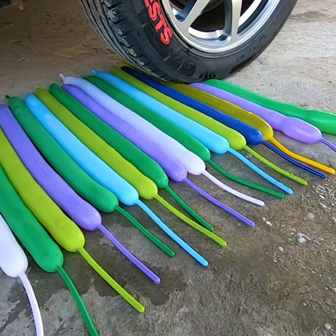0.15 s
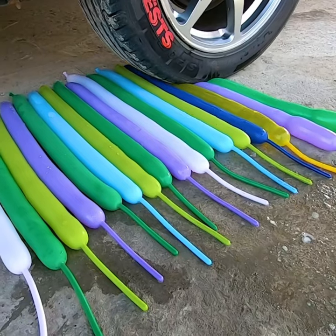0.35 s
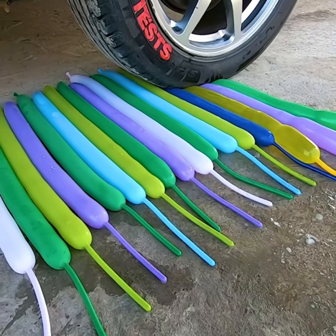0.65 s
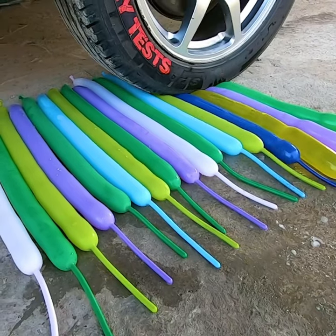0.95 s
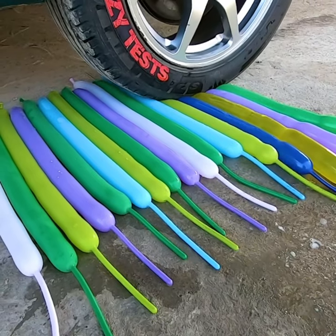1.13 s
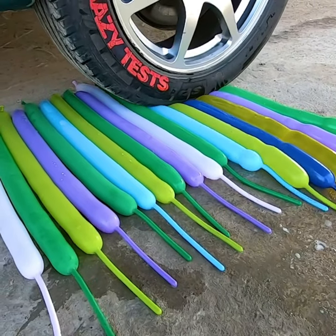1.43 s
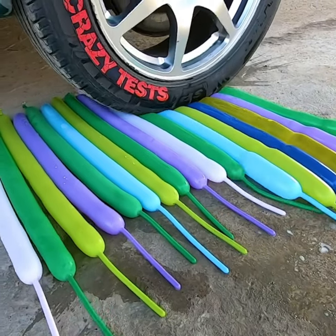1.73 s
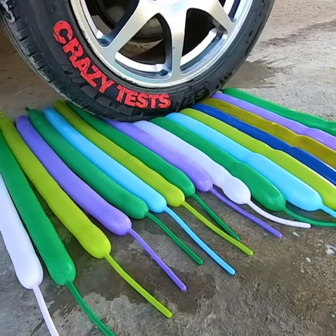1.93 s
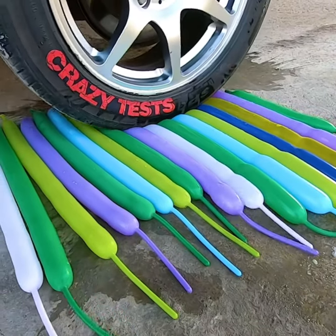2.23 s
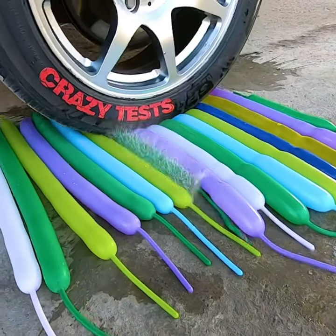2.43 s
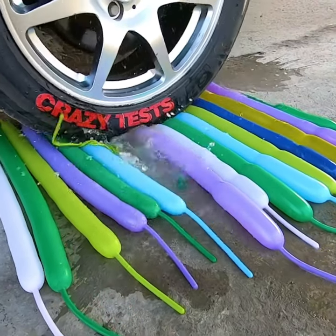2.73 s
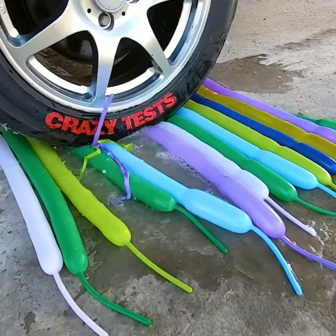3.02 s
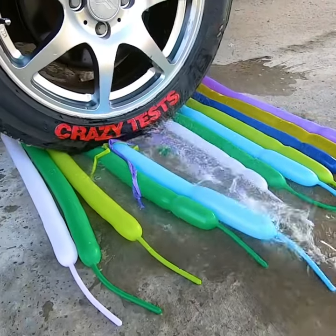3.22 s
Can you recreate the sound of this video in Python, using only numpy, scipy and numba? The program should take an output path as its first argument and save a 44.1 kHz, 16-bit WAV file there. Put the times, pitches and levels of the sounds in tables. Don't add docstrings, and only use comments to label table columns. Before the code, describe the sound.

Balloons full of water crack and splash under a tyre in separate bursts, after a quieter stretch of deep idling engine, airy yard noise and a leaking squirt; close, dry outdoor pickup with little echo.

```python
import sys
import numpy as np
from scipy import signal
from scipy.fft import rfft, irfft, next_fast_len
from scipy.io import wavfile
from scipy.ndimage import uniform_filter1d
from numba import njit

SR = 44100
rng = np.random.default_rng(int(sys.argv[2]) if len(sys.argv) > 2 else 0)


def invert_db(level):
    return 10 ** (np.asarray(level, dtype=float) / 20)


def transcribe(signal):
    frames = np.atleast_2d(signal).T
    limited = np.clip(frames, -1, 1)
    pcm = np.round(limited * 32767).astype(np.int16)
    wavfile.write(sys.argv[1], SR, pcm)


N = 148617
T = np.arange(N) / SR


def unit(x):
    return x / np.sqrt(np.mean(x ** 2) + 1e-30)


def curve(table, axis):
    return np.interp(T, np.array(table)[:, 0], np.array(table)[:, axis])


def colour(x, points):
    n, p = next_fast_len(len(x)), np.array(points)
    hz = np.maximum(np.arange(n // 2 + 1) * SR / n, 1)
    gain_db = np.interp(np.log(hz), np.log(p[:, 0]), p[:, 1])
    return irfft(rfft(x, n) * invert_db(gain_db), n)[:len(x)]


def band(x, hz, width):
    return signal.lfilter(*signal.iirpeak(min(hz, .45 * SR), hz / min(width, .3 * SR), SR), x)


def steep(x, hz, width):
    return unit(band(band(x, hz, width), hz, width))


def noise(n=N):
    return rng.standard_normal(n)


def walk(rate):
    k = int(SR / rate)
    steps = np.repeat(noise(N // k + 1), k)
    return uniform_filter1d(uniform_filter1d(steps, k), k)[:N]


def shape(t, rise, hold, t60):
    return np.clip(t / rise, 0, 1) * invert_db(-60 * np.clip(t - rise - hold, 0, None) / max(t60, .002))


def add(out, s, x):
    i = int(s * SR)
    out[i:i + len(x)] += x[:N - i]


@njit
def drops(at, hz, cycles, size, glide, n, sr):
    out = np.zeros(n)
    for j in range(len(at)):
        long, phase = cycles[j] * sr / hz[j], 0.
        for i in range(min(int(2 * long), n - at[j])):
            phase += 2 * np.pi * hz[j] / sr * (1 + glide * i / long)
            out[at[j] + i] += size[j] * np.sin(phase) * np.exp(-3 * i / long)
    return out


def patter(n, octaves, hz, cycles, scatter_db, count):
    u, g = rng.random((count, 3)).T, noise(count)
    at = (u[0] * n).astype(np.int64)
    pitch = np.clip(hz[at] * 2 ** (octaves * g), 300, 15000)
    size = invert_db(-scatter_db * np.log(u[1] + 0.0014))
    ring_cycles = cycles * (.5 + 2 * u[2] ** 2)
    return unit(drops(at, pitch, ring_cycles, size, 0.16, n, 1. * SR))


def yard():
    # frequency in Hz, level in dB per Hz.
    tone = [(45, -6), (150, 1), (380, -11.5), (640, -7.5), (1400, -16), (2800, -26.5), (5000, -31),
            (12000, -45.5)]
    # frequency in Hz, gain in dB.
    top = [(13000, 0), (14500, -25)]
    base, swell, out = colour(noise(), tone), walk(0.77), 0
    for hz in 50 * 2 ** np.arange(0, 8.3, .5):
        flicker_db = swell + 1.6 * walk(14)
        out = out + invert_db(flicker_db) * band(base, hz, hz / 2.5)
    return invert_db(-51.5) * unit(colour(out, top))


def buffet():
    gust_s, gust_long_s = 2.927, 0.16
    gust_db = 18.5 * np.exp(-((T - gust_s) / gust_long_s) ** 2)
    return invert_db(-39 + gust_db) * steep(noise(), 11, 4.1)


def hiss():
    t60_s = 1.74
    return invert_db(-68 - 60 * T / t60_s) * unit(band(noise(), 10000, 8100))


def chirps():
    # start in seconds, level in dB, first pitch in Hz, last pitch in Hz, length in seconds.
    notes_sung = [
        (.35, -72, 5900, 5700, .025),
        (0.711, -69, 3800, 4100, 0.037),
        (0.739, -68.5, 3500, 3120, .035),
        (1.038, -72, 4600, 4950, .06),
        (1.085, -69, 4700, 4280, 0.026),
        (1.117, -71, 3700, 4050, 0.049),
        (1.15, -71, 4350, 4370, 0.022),
        (1.409, -70, 3300, 3500, 0.037),
        (1.445, -70, 3900, 3950, .025),
        (1.463, -68, 3700, 3620, .04),
    ]
    fade_db, flutter_db, whine_hz = -5, 6, 5200
    out = invert_db(-85) * unit(band(noise(), whine_hz, whine_hz / 60))
    for s, db, hz, last_hz, long in notes_sung:
        u = np.arange(int(long * SR)) / (long * SR)
        level = invert_db(db + fade_db + flutter_db * walk(150)[:len(u)])
        phase = 2 * np.pi * np.cumsum(hz + (last_hz - hz) * u) / SR
        add(out, s, level * 2 * np.sin(np.pi * u) * np.sin(phase))
    return out


def fan():
    return np.sqrt(2) * invert_db(-55.5 + 2 * walk(0.91)) * np.sin(2 * np.pi * 68 * T)


def belt():
    return invert_db(-66) * unit(band(noise(), 1380, 1380 / 30))


def engine():
    # time in seconds, firing rate in Hz, level in dB, overtone lift in dB.
    firing = [
        (0.06, 26.66, -28, 1.5),
        (.6, 27.77, -26.5, -2),
        (1.1, 28.52, -25.5, -1),
        (1.62, 28.7, -25, -4.5),
        (1.8, 27.61, -25, -2.5),
        (2.2, 27.62, -25, -3.5),
        (2.55, 26.06, -27.5, -8.5),
        (2.85, 26.12, -27.5, -4.5),
        (3.0, 26.68, -29, -5),
        (3.34, 25.71, -25.5, -7),
    ]
    # multiple of the firing rate, level in dB.
    orders = [(1, 0), (2, -37), (3, -36.5), (4, -31), (5, -22.5), (6, -23.5), (7, -38), (8, -47.5),
              (9, -51), (10, -36.5), (11, -47.5), (12, -43.5)]
    turn = .04 + np.cumsum(curve(firing, axis=1)) / SR
    lift_db = curve(firing, axis=3)
    out = np.sin(2 * np.pi * turn)
    for k, order_db in orders[1:]:
        level = invert_db(order_db + 2.5 * walk(5.87) + lift_db)
        cycles = k * turn + rng.random() + 0.072 * walk(4.04)
        out = out + level * np.sin(2 * np.pi * cycles)
    return np.sqrt(2) * invert_db(curve(firing, axis=2)) * out


def squeaks():
    # start in seconds, level in dB, pitch in Hz, length in seconds.
    rubs = [
        (2.212, -56, 8540, 0.014),
        (3.243, -48, 650, 0.028),
        (2.126, -56, 2010, 0.058),
        (2.886, -55, 2570, 0.036),
        (3.316, -47, 2600, 0.007),
        (3.332, -50.5, 1339, 0.013),
    ]
    out, t = np.zeros(N), T[:6000]
    for s, db, hz, long in rubs:
        whistle = band(band(noise(len(t)), hz, 0.18 * hz), hz, 0.18 * hz)
        add(out, s, invert_db(db) * shape(t, 0.23 * long, long, long) * unit(whistle))
    return out


def thuds():
    # start in seconds, level in dB, t60 in seconds, tilt in dB per octave.
    landings = [
        (1.96, -46.5, 0.32, -5),
        (2.406, -27.5, 0.22, -6),
        (2.462, -36, 0.26, 7),
        (2.526, -33, 0.19, 0.5),
        (2.836, -52, 0.091, 1.5),
        (3.191, -53, .06, -14),
        (3.229, -45.5, 0.077, 4),
    ]
    # frequency in Hz, width in Hz, level in dB.
    gap = [(241, 79, 3), (321, 78, 3.5), (531, 147, 6), (626, 120, 1.5)]
    out, t = np.zeros(N), T[:14000]
    for s, db, t60, tilt_db in landings:
        blow = noise(len(t)) * shape(t, 0.0026, 0.0046, t60)
        ring = 0
        for hz, width, ring_db in gap:
            ring = ring + invert_db(ring_db + tilt_db * np.log2(hz / 230)) * steep(blow, hz, width)
        add(out, s, invert_db(db - 11.5) * unit(ring))
    return out


def haze():
    return invert_db(-81) * (T > 1.68) * unit(band(noise(), 12500, 7000))


def trickle():
    # time in seconds, level in dB, centre pitch in Hz, fine mist share in dB.
    leak = [(1.8, -70, 2978, -6), (1.86, -52, 3500, -21), (1.93, -73, 2187, -10), (1.975, -41, 2783, -25),
            (2.02, -51.5, 3680, -16), (2.09, -55, 3600, -8.5), (2.15, -51, 3950, -8),
            (2.25, -55.5, 4023, -4.5), (2.33, -81, 3500, -5), (2.4, -53.5, 3942, 3.5),
            (2.6, -97, 3500, -11.5), (2.71, -50.5, 2900, -14), (2.88, -55.5, 2432, -4),
            (2.96, -53.5, 3500, -15), (3.08, -60, 2948, -7), (3.16, -50, 2995, -9),
            (3.37, -54.5, 3170, -7.5)]
    fizz = patter(N, .3, curve(leak, axis=2), cycles=14, scatter_db=2.5, count=14000)
    mist = unit(band(noise(), 9000, 3500)) * invert_db(2 * walk(30) + 2.5 * walk(300))
    water = fizz + invert_db(curve(leak, axis=3)) * mist
    return invert_db(curve(leak, axis=1)) * (T > 1.8) * water


def sprays():
    # start in seconds, level in dB, centre pitch in Hz, hold in seconds, t60 in seconds.
    bursts = [(1.665, -48, 2580, 0.011, 0.24), (1.679, -33, 2820, 0.014, 0.23),
              (1.721, -55, 7000, 0.012, 0.086), (1.953, -45, 3500, 0.0054, 0.17),
              (2.4035, -19, 2750, .015, 0.14), (2.468, -40.5, 1660, 0.0053, 0.37),
              (2.525, -22.5, 2550, 0.013, 0.13), (2.556, -26.5, 2580, 0.011, 0.12),
              (3.127, -70, 9900, 0.018, .1), (2.597, -47.5, 9200, 0.027, 0.15),
              (2.655, -42.5, 4502, 0.0083, 0.12), (2.77, -32, 4700, 0.017, 0.13),
              (2.794, -33, 3900, 0.019, 0.13), (2.827, -44, 1190, 0.016, 0.26),
              (3.19, -22, 4250, 0.0095, 0.075), (3.209, -21, 2040, 0.01, 0.065),
              (3.232, -27.5, 1990, 0.0067, 0.2)]
    out, t = np.zeros(N), T[:14000]
    for s, db, hz, hold, t60 in bursts:
        water = patter(len(t), 0.83, hz + 0 * t, cycles=3.24, scatter_db=3.5, count=2500)
        mist = steep(noise(len(t)), hz, hz * 3) * invert_db(5.5 * walk(167)[:len(t)])
        add(out, s, invert_db(db) * shape(t, 0.0014, hold, t60) * (water + invert_db(-9) * mist))
    return out


def slaps():
    # start in seconds, peak in dB, pitch in Hz, t60 in seconds.
    pockets = [(1.6787, -24.5, 1235, 0.013), (1.68, -22, 2690, .012), (1.683, -27, 1160, .015),
               (1.6903, -20, 4370, 0.03), (2.405, -15.5, 2510, 0.0071), (2.4061, -21, 1030, 0.01),
               (2.4115, -15.5, 3040, 0.012), (2.419, -14, 2300, .012), (2.421, -20, 1270, .012),
               (2.4356, -10, 1680, .013), (2.471, -25, 1740, .02), (2.4866, -16, 910, 0.011),
               (2.491, -27, 1400, 0.011), (2.5258, -21, 641, .012), (2.526, -14, 1390, .007),
               (2.532, -12, 1230, .018), (2.538, -16, 2200, .012), (2.539, -19, 677, 0.013),
               (2.5549, -14, 1930, 0.0073), (2.5554, -13.5, 1470, 0.017), (2.563, -16, 1120, .018),
               (2.571, -21.5, 1120, .025), (2.732, -18.5, 4330, 0.015), (2.742, -35, 4360, .01),
               (2.7716, -15, 3650, 0.0055), (2.793, -20, 4740, .01), (2.798, -23, 4810, 0.017),
               (2.7985, -20, 2520, 0.016), (2.8015, -27, 1610, 0.016), (2.8075, -20.5, 3500, .01),
               (2.831, -29, 1520, 0.013), (2.838, -23, 1240, 0.02), (2.837, -23.5, 557, 0.081),
               (2.947, -34.5, 3380, 0.013), (3.156, -37, 2800, 0.037), (3.192, -17, 4454, .012),
               (3.202, -16.5, 1493, .015), (3.2132, -5, 1377, 0.01), (3.2154, -12, 2900, .01),
               (3.2166, -6, 1094, 0.022), (3.222, -12, 1038, .015), (3.242, -21, 1110, .015),
               (3.257, -25, 1300, .012), (3.229, -14, 1167, 0.013), (3.231, -12.5, 2450, 0.007),
               (3.2322, -11.5, 703, 0.021), (3.2365, -15, 2125, 0.015), (3.25, -19, 2446, 0.02),
               (3.272, -26, 1150, 0.015)]
    late_s, glide, roughness, upper_db, rise_cycles = .0005, 2, .42, -9, 1.5
    out, t = np.zeros(N), T[:4000]
    for s, db, hz, t60 in pockets:
        rough = steep(noise(len(t)), hz, 0.25 * hz)
        upper = steep(noise(len(t)), 2.2 * hz, hz)
        rough = rough + invert_db(upper_db) * (1200 / hz) ** 2 * upper
        tone = np.sin(2 * np.pi * hz * t * (1 + glide * t))
        envelope = shape(t, rise_cycles / hz, 0.0011, t60)
        add(out, s + late_s, 0.63 * invert_db(db) * envelope * (tone + roughness * rough))
    return out


def tears():
    # start in seconds, peak in dB, treble share in dB.
    rips = [(2.406, 0.5, 5.5), (2.4302, -14.5, 5), (2.5271, -8.5, -10), (2.535, -13, -7), (2.73, -35, 3),
            (2.744, -38, -16), (2.771, -9.5, 5.5), (2.7948, -16, 9), (2.7983, -16.5, -2),
            (2.4101, -9.5, -8), (3.199, -19, -7), (2.87, -32, 7), (3.192, -6, 14), (3.2046, -12, -5),
            (3.2323, -20, 2), (3.29, -32, -6), (3.317, -40, 14), (2.658, -31, 8), (2.5565, -18, -8),
            (2.729, -41, 9), (3.33, -42, 12), (2.635, -46, 10), (3.16, -38, 12)]
    out, t = np.zeros(N), T[:1500]
    for s, db, treble_db in rips:
        snap = noise(len(t)) * shape(t, .0007, .0007, .004)
        body = unit(band(snap, 3500, 1780))
        treble = steep(snap, 8800, 5500)
        crack = body + invert_db(treble_db - 6) * treble
        add(out, s, invert_db(db) * crack / np.abs(crack).max())
    return out


def scene():
    # frequency in Hz, gain in dB.
    mic = [(300, -20.5), (900, -2.5), (5600, 0.5), (6800, -6.5), (8000, 0), (11800, -1), (12600, -6),
           (15600, -9)]
    surroundings = yard() + buffet() + hiss() + chirps()
    car = engine() + fan() + belt() + squeaks() + thuds()
    water = trickle() + haze() + sprays() + slaps() + tears()
    return (surroundings + car + colour(water, mic))[None]


def roll_off(x):
    return signal.sosfilt(signal.butter(12, 16510, fs=SR, output="sos"), x)


def record(dry):
    ceiling, opens_s = .9, .0363
    rounded = ceiling * np.tanh(dry / ceiling)
    lowpass = signal.ellip(8, .3, 45, 15800, fs=SR, output="sos")
    mix = signal.sosfilt(lowpass, rounded) * (T >= opens_s)
    return roll_off(mix)


dry = scene()
out = record(dry)
transcribe(out)
```